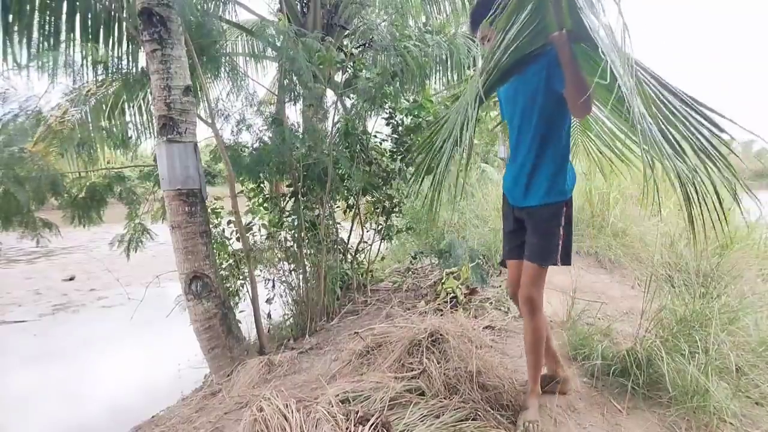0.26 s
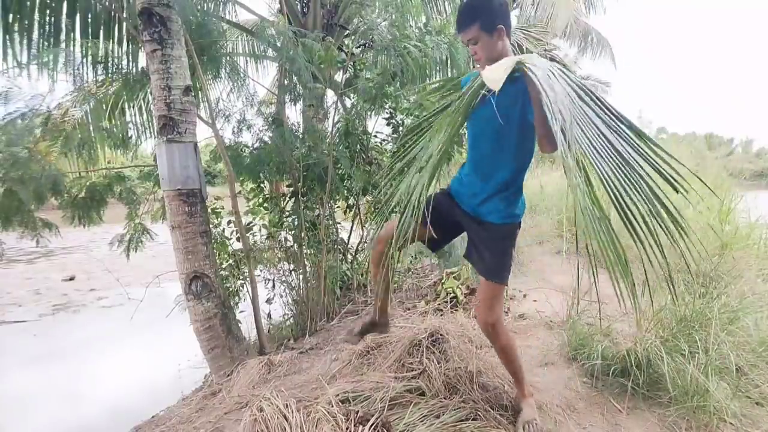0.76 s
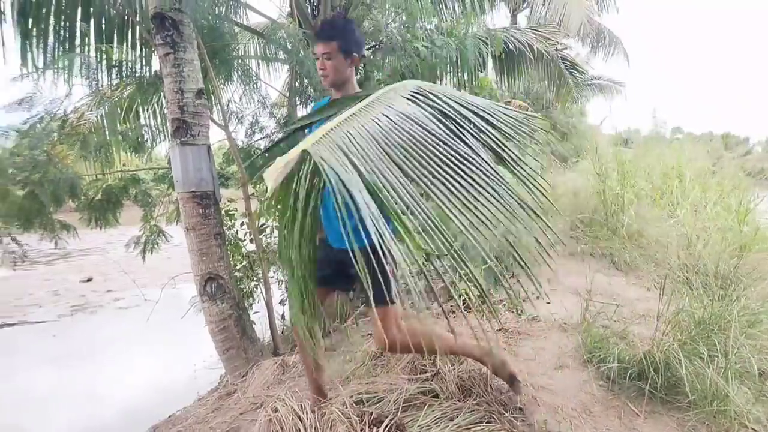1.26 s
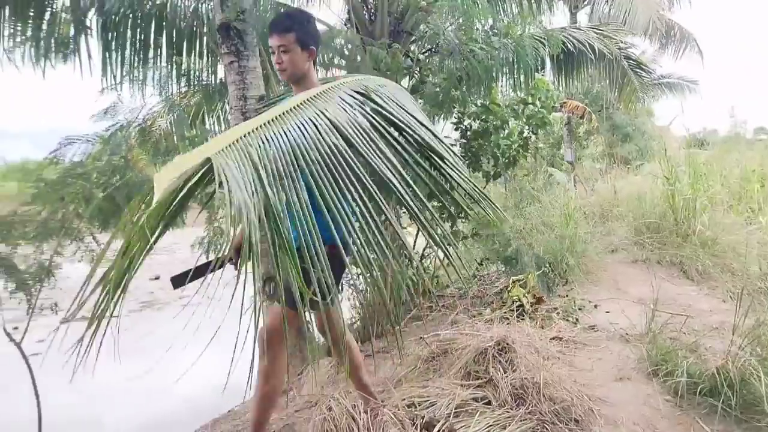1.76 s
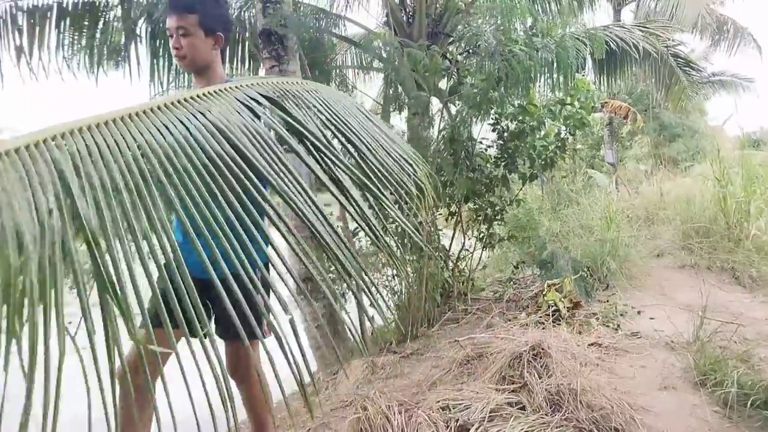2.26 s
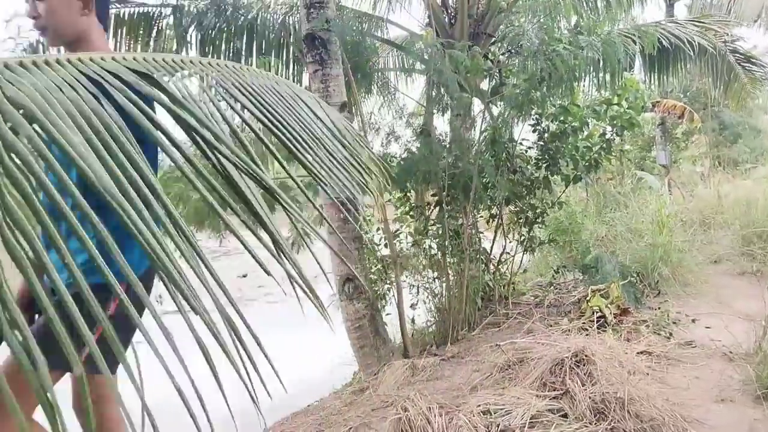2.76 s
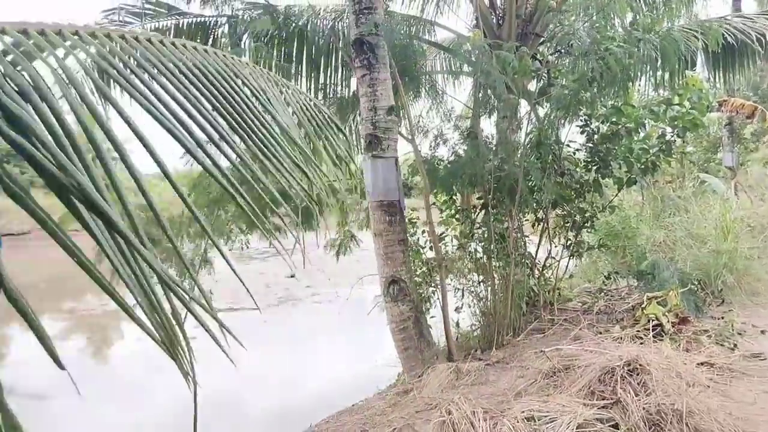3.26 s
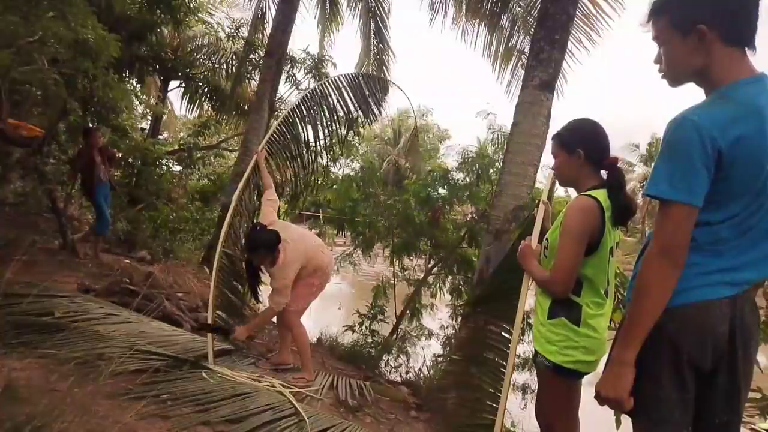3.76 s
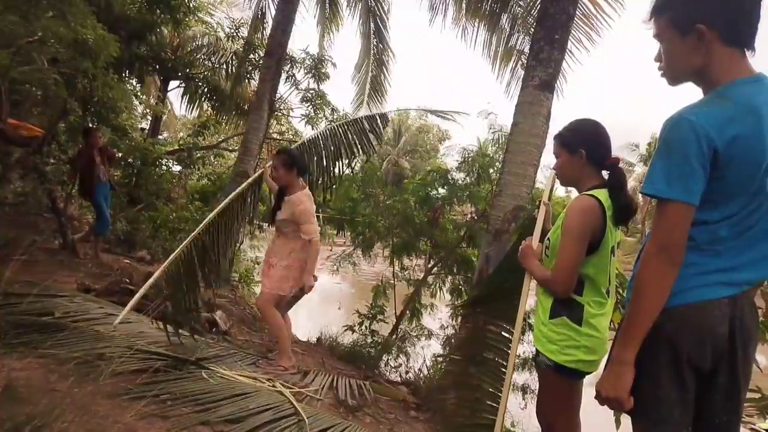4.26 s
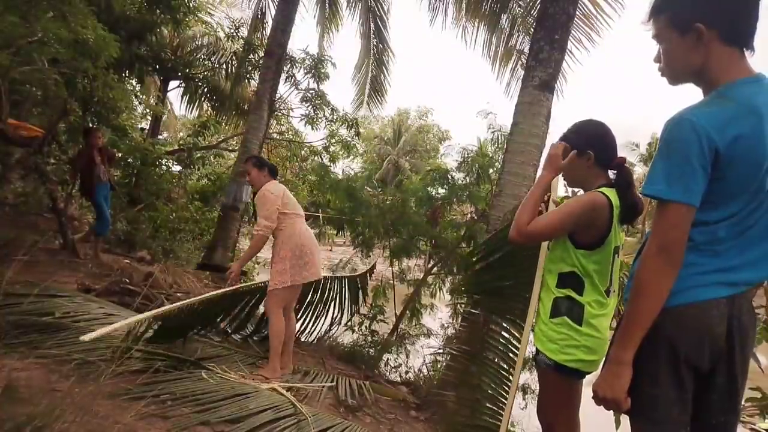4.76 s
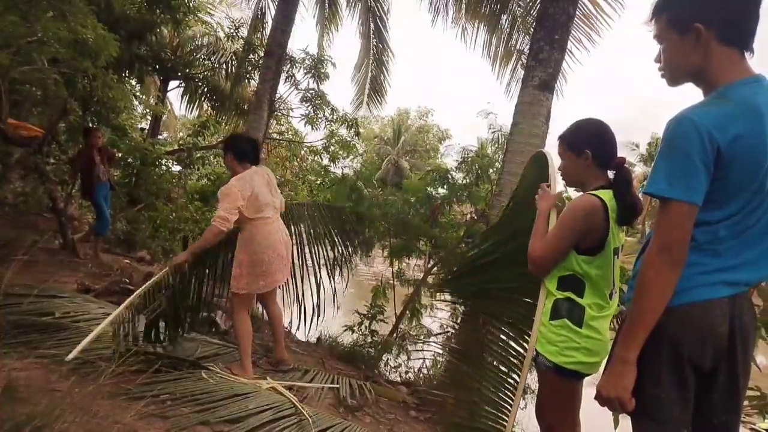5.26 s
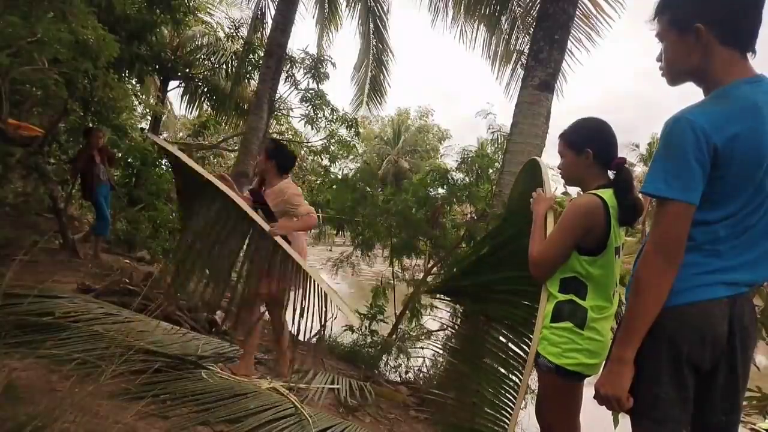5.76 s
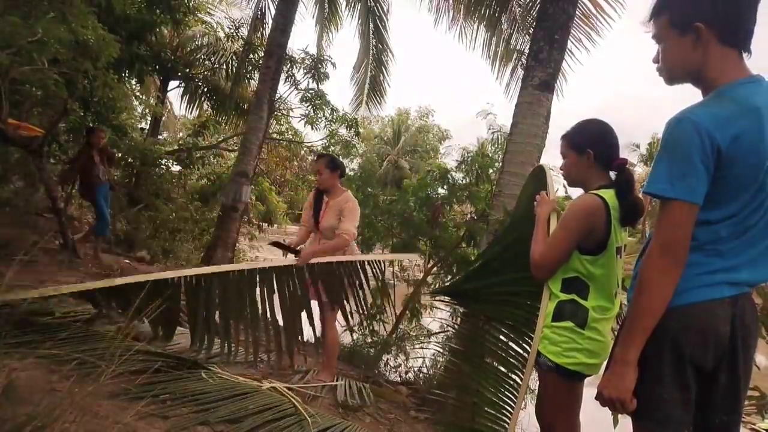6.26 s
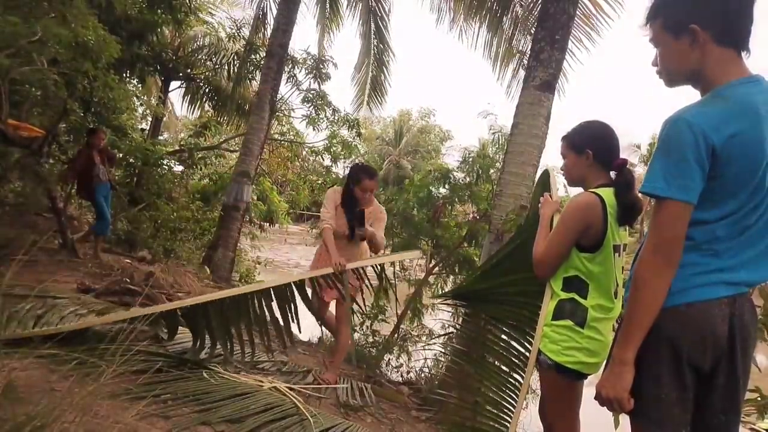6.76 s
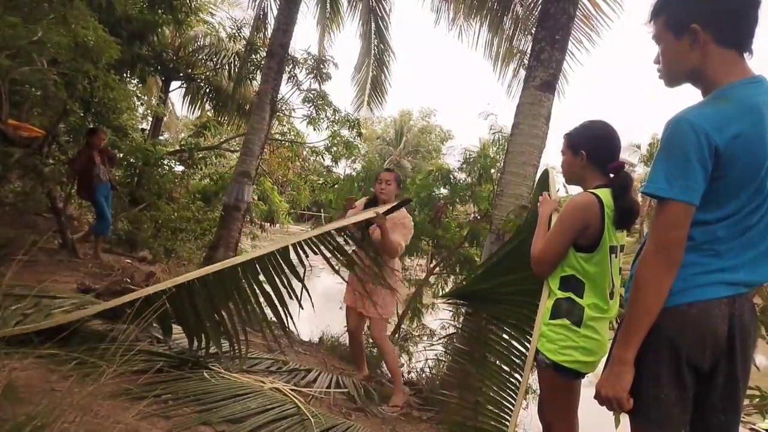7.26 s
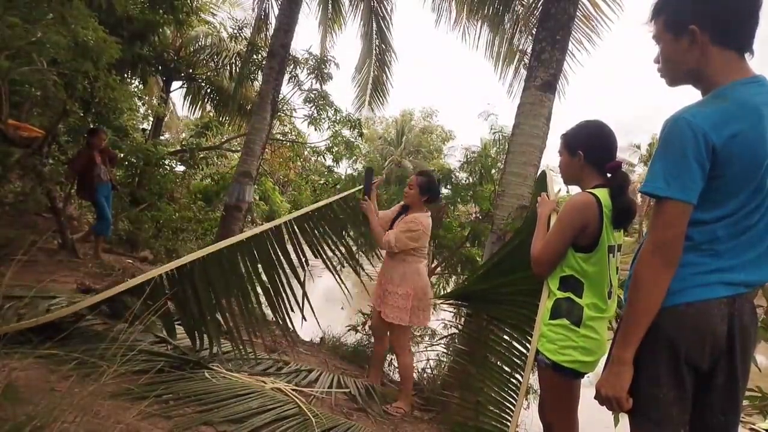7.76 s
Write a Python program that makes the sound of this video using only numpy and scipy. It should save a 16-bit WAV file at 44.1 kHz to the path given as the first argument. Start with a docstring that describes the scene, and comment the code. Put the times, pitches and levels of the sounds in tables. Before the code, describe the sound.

A bird gives a thin whistle and twitter, then another warbles clearly nearby as a dry palm frond crackles with a few sharp snaps. A run of rising chirps, with a soft dull knock beneath, grows into a rapid high trill. Fainter birds then sing farther off among the palms and bushes. Gentle outdoor air and hissing leaves continue throughout, and a low rumble drops out halfway.

```python
"""A thin whistle sounds over soft outdoor air, leaf hiss, far birds and a low rumble that stops halfway.
A songbird warbles close by, a dry frond crackles and snaps, and a fast high trill follows, with one
dull knock under it; last come songbirds deeper in the palms and bushes. Each syrinx gives a gliding,
nearly pure tone that trunks and leaves scatter back as echoes. The snaps are short noise bursts, the
knock a pulse with a noisy body; air, rumble, hiss and a far chorus are bands of noise."""
import sys
import numpy as np
from scipy import signal
from scipy.fft import rfft, irfft
from scipy.io import wavfile
from scipy.ndimage import uniform_filter1d

SR = 44100
rng = np.random.default_rng(int(sys.argv[2]) if len(sys.argv) > 2 else 0)


def dump(signal):
    """Clip the signal to [-1, 1] and save it as 16-bit WAV at the path in sys.argv[1]."""
    limited = np.clip(np.atleast_2d(signal).T, -1, 1)
    pcm = np.round(limited * 32767).astype(np.int16)
    wavfile.write(sys.argv[1], SR, pcm)


N = 353682
TIME = np.arange(N) / SR


def gain_of(db):
    """Amplitude ratio of a level in decibels."""
    return 10 ** (np.asarray(db) / 20)


def unit_rms(x):
    """Normalisation to unit power."""
    return x / np.sqrt(np.mean(x ** 2) + 1e-20)


def contour(table, at=TIME):
    """Linear interpolation in a two-column table."""
    return np.interp(at, *np.transpose(table))


def add(mix, start_s, sound):
    """Superposition of a sound on the mix."""
    part = mix[max(round(start_s * SR), 0):][:len(sound)]
    part += sound[:len(part)]


def drift(hz, size=N):
    """Random fluctuation: noise of unit rms, low-passed at hz."""
    f = np.fft.rfftfreq(size, 1 / SR)
    return unit_rms(irfft(rfft(rng.standard_normal(size)) / (1 + (f / hz) ** 4), size))


def noise(spectrum, width):
    """Coloured stereo noise: an independent side signal decorrelates the channels."""
    log_hz = np.log(np.fft.rfftfreq(N, 1 / SR) + 1)
    colour, spread = (gain_of(np.interp(log_hz, np.log(hz), db))
                      for hz, db in (np.transpose(spectrum), np.transpose(width)))
    middle, side = rfft(rng.standard_normal((2, N))) * colour
    return unit_rms(irfft(np.array([middle + spread * side, middle - spread * side]), N))


def panned(x, left_db):
    """Direction from the level difference of left over right."""
    return x * gain_of(np.array([[left_db], [-left_db]]) / 2)


def slur(start_s, length, start_hz, middle_hz, end_hz, db, fade_db=0, drop_hz=0, *, attack_s, release_s):
    """A parabolic glide, as points (time [s], frequency [Hz], level [dB])."""
    u = np.linspace(0, 1, 41)
    t = u * length
    bow_hz = middle_hz - (start_hz + end_hz) / 2
    arc = start_hz + (end_hz - start_hz) * u + bow_hz * (1 - (2 * u - 1) ** 2)
    drop = drop_hz * np.clip(1 - (length - t) / .015, 0, 1)  # in the last 15 ms
    rise_s = min(attack_s, .23 * length)
    gate = np.clip(np.minimum(t / rise_s, (length - t) / release_s), .1, 1)
    return np.transpose([start_s + t, arc - drop, db - fade_db * (u - .5) + 20 * np.log10(gate)])


def syrinx(notes, waver, flutter_db, waver_hz=180):
    """The syrinx oscillates almost sinusoidally; fast, deep frequency modulation makes it hoarse."""
    out, bend, flutter = np.zeros(N), drift(waver_hz), drift(290)
    for note in notes:
        times, hz, db = np.transpose(note)
        times = np.sort(times)
        at = np.arange(int(times[0] * SR), min(int(times[-1] * SR), N))
        t = at / SR
        pitch = uniform_filter1d(np.interp(t, times, hz), size=130) * (1 + waver * bend[at])
        ramp = np.clip(np.minimum(t - times[0], times[-1] - t) / .002, 0, 1)
        level = gain_of(np.interp(t, times, db) + flutter_db * flutter[at])
        add(out, times[0], level * np.sin(np.pi / 2 * ramp) ** 2 * np.sin(2 * np.pi * np.cumsum(pitch) / SR))
    return out


def trees(x, early_db, late_db, early_t60, late_t60, spread, build_s=.03):
    """Scattering: near trunks return early echoes, the wood behind a slower reverberant tail."""
    t = np.arange(SR) / SR
    onset = np.clip((t - .002) / .003, 0, 1)
    taps = rng.standard_normal((2, 2, SR)) * (rng.random((2, 2, SR)) < .1) * onset
    early = unit_rms(taps[0] * gain_of(-60 * t / early_t60))
    late = unit_rms(taps[1] * gain_of(-60 * t / late_t60) * np.minimum(t / build_s, 1))
    response = (gain_of(early_db) * early + gain_of(late_db) * late) / np.sqrt(SR)
    middle, side = signal.fftconvolve(x[None], response, axes=1)[:, :N]
    return np.array([middle + spread * side, middle - spread * side])


# Spectrum of the air: (frequency [Hz], relative density [dB])
AIR_SPECTRUM = [(25, -19.5), (60, -40.5), (100, -34), (150, -20), (210, -6.5), (300, -1.5), (600, -4.5),
                (900, -9), (1500, -13), (3000, -18), (5000, -30), (8000, -20.5), (13000, -25.5),
                (14500, -48), (15200, -51)]
# Stereo width of air and chorus: (frequency [Hz], side over middle [dB])
AIR_WIDTH = [(60, 6), (200, -12), (380, -26), (700, -17.5), (1290, -3), (2380, -15), (4400, -49),
             (15000, -48)]

def air():
    """Outdoor air is broadband noise with slight amplitude modulation."""
    return noise(AIR_SPECTRUM, AIR_WIDTH) * gain_of(-54 + .83 * drift(9.5))


# Spectra of the rumble and its deep buffeting: (frequency [Hz], relative density [dB])
RUMBLE_SPECTRUM = [(15, -26), (32, -16), (58, -5.5), (110, -0.5), (155, -5), (205, -15), (300, -21.5),
                   (600, -28), (2000, -75)]
BUFFET_SPECTRUM = [(12, -13), (28, 5.5), (55, 15), (90, -6), (160, -20), (500, -66)]
# Stereo width of both: (frequency [Hz], side over middle [dB])
RUMBLE_WIDTH = [(30, -6), (70, -6), (130, -17), (400, -7.5)]
# Envelope of both: (time [s], relative level [dB])
RUMBLE_LEVEL = [(0, 5), (.6, 1.5), (2, 1.5), (3.6, 2.5), (3.72, -7), (3.82, -51), (4.0, -68)]

def rumble():
    """Low-frequency noise, lumpy from random modulation, with buffeting on the right."""
    buffet = gain_of(-13.5) * panned(noise(BUFFET_SPECTRUM, RUMBLE_WIDTH), left_db=-12)
    body = panned(noise(RUMBLE_SPECTRUM, RUMBLE_WIDTH), left_db=-1)
    return (body + buffet) * gain_of(-46.5 + contour(RUMBLE_LEVEL) + 1.6 * drift(15))


# Spectrum of the leaves: (frequency [Hz], relative density [dB])
LEAF_SPECTRUM = [(300, 0), (1500, 2.5), (5000, 7.5), (9000, -7), (12500, -7.5), (15500, -6)]
# Their stereo width: (frequency [Hz], side over middle [dB])
LEAF_WIDTH = [(500, 2), (1500, -1.5), (5000, -18.5), (8000, -16.5), (12000, -11.5)]
# Their envelope: (time [s], level [dB], rms flicker [dB])
LEAF_LEVEL = [(0, -53.5, 2.3), (.6, -52, 1.9), (.9, -53.5, 1.5), (1.2, -50.5, 2), (1.6, -49.5, 0.5),
              (1.8, -55, 1.5), (2.6, -57, 1.5), (3.4, -55, 2), (3.8, -57.5, 0.5)]

def leaf_hiss():
    """Leaves sum incoherently to a fine, flickering hiss that calms halfway."""
    times, db, flicker_db = np.transpose(LEAF_LEVEL)
    hiss = noise(LEAF_SPECTRUM, LEAF_WIDTH)
    return hiss * gain_of(np.interp(TIME, times, db) + np.interp(TIME, times, flicker_db) * drift(22.4))


# Distant tones: (frequency [Hz], full level [dB])
DRONE_TONES = [(283, -73), (1089, -72), (1141, -73.5)]
# Their swell: (time [s], gain [dB])
DRONE_SWELL = [(0, -5), (2.3, -5), (3.0, 0)]

def drone():
    """Faint sinusoids, each wandering in frequency, superpose into a drone."""
    tones = sum(gain_of(db) * np.sqrt(2) * np.sin(2 * np.pi * np.cumsum(hz + 2.64 * drift(5)) / SR)
                for hz, db in DRONE_TONES)
    return tones * gain_of(contour(DRONE_SWELL))


# Spectrum of far twittering: (frequency [Hz], relative density [dB])
CHORUS_SPECTRUM = [(2500, -18.5), (5000, -9.5), (6200, 2), (7500, 1.5), (8300, -4), (9300, -12.5),
                   (12000, -18), (14000, -40)]
# Its envelope: (time [s], level [dB])
CHORUS_LEVEL = [(0, -55.5), (.8, -87), (1.6, -63), (2.1, -56), (4.9, -45), (5.3, -78), (6.0, -71),
                (6.4, -65), (7.2, -59.5), (8.0, -59.5)]

def chorus():
    """Many far voices add incoherently into one high noise band that swells unevenly."""
    level_db = contour(CHORUS_LEVEL) + 2 * drift(21)
    return noise(CHORUS_SPECTRUM, AIR_WIDTH) * gain_of(level_db)


# Far calls and, at 2.317 s and 2.56 s, the hoarse low part of two trill chips:
# (time [s], duration [s], start [Hz], end [Hz], relative level [dB])
RASPS = [(0.024, 0.084, 8800, 7900, -53), (0.026, 0.071, 5840, 5580, -46.5), (0.502, 0.25, 5080, 4770, -50),
         (1.136, 0.064, 2254, 2540, -39.5), (2.317, 0.04, 4760, 5160, -47.5),
         (2.56, 0.055, 5020, 5340, -46), (4.32, 0.11, 2284, 2200, -52), (4.591, 0.095, 4480, 4450, -46),
         (5.701, 0.078, 5740, 6300, -52), (6.88, 0.19, 3400, 3534, -47), (7.025, 0.168, 4040, 4300, -50),
         (7.572, 0.078, 4900, 4950, -42.5), (7.599, 0.062, 1850, 1730, -42.5),
         (7.846, 0.066, 5580, 5700, -41), (7.96, .06, 6100, 6400, -47)]
# Scratchy notes: (time [s], duration [s], start [Hz], middle [Hz], end [Hz], relative level [dB])
FAR_SONG = [ (.15, 0.57, 6130, 6350, 6160, -55), (4.245, 0.057, 2035, 2104, 2080, -56),
            (4.303, 0.14, 2206, 2655, 2230, -55), (4.567, 0.025, 3530, 4000, 4130, -49),
            (4.589, 0.096, 4127, 4030, 3950, -52), (5.183, 0.048, 2340, 2655, 3250, -57),
            (5.21, 0.036, 3130, 3650, 4170, -51), (5.222, 0.025, 2640, 3200, 3950, -49.5),
            (5.363, 0.027, 3930, 4120, 4150, -55.5), (5.385, .022, 5120, 5530, 5700, -55),
            (5.424, 0.03, 3640, 4070, 4800, -54), (5.438, 0.032, 5650, 5370, 5400, -58),
            (5.502, 0.016, 3750, 3950, 4200, -53), (5.512, 0.023, 5450, 5150, 4550, -53.5),
            (5.72, 0.04, 3380, 3770, 4300, -55), (5.764, 0.03, 3710, 4330, 4800, -55),
            (5.765, .036, 4720, 5540, 5850, -53), (5.97, 0.059, 1920, 1814, 1800, -57),
            (6.126, .014, 5660, 4540, 3300, -59), (6.239, .016, 5100, 4100, 3600, -60),
            (6.248, 0.02, 2400, 2500, 2550, -54.5), (6.421, 0.025, 3540, 3125, 2600, -52),
            (6.497, .016, 5400, 5070, 4500, -61), (6.54, 0.018, 7300, 7450, 7400, -58),
            (7.076, 0.02, 5280, 5340, 5300, -49.5), (7.765, 0.039, 6730, 5850, 5100, -45),
            (7.787, 0.021, 5900, 6800, 7900, -52), (7.799, 0.054, 6400, 5600, 4970, -47),
            (7.908, 0.056, 5500, 5480, 5480, -48.5), ]

def far_song_and_rasps():
    """Beyond the critical distance, echoes outweigh the direct sound of notes and rasps."""
    rasps = [[(s, start, db - 1.5), (s + length / 2, (start + end) / 2, db), (s + length, end, db - 9)]
             for s, length, start, end, db in RASPS]
    notes = [slur(*row, attack_s=.014, release_s=.003) for row in FAR_SONG]
    voice = gain_of(-2) * syrinx(rasps, waver=.06, flutter_db=3, waver_hz=700)
    voice += gain_of(5) * syrinx(notes, waver=.032, flutter_db=3, waver_hz=400)
    echoes = trees(voice, early_db=-4.5, late_db=-3.2, early_t60=.2, late_t60=.75, spread=.008)
    return gain_of(-3) * voice + echoes


# Long whistles: (time [s], duration [s], held pitch [Hz], scoop [Hz], warble depth [Hz], rise [s],
# relative level [dB], fade [dB])
WHISTLES = [(0.12, 0.11, 7206, 900, 570, 0.02, -17, -4.5), (0.226, 0.048, 7070, 5, 40, 0.0083, -21, -3),
            (0.34, 0.17, 7483, 560, 352, 0.086, -17, 10.5)]
# Closing twitter: (time [s], duration [s], start [Hz], middle [Hz], end [Hz], relative level [dB])
TWITTER = [(.526, 0.028, 7130, 7230, 8000, -36.5), (.569, 0.018, 7070, 7400, 7660, -37),
           (0.606, 0.05, 7400, 7420, 7700, -37.5), (.653, 0.024, 7330, 7400, 7750, -35),
           (.671, 0.018, 7300, 7770, 8150, -34), (0.695, 0.0266, 7280, 7540, 8300, -31.5),
           (.725, 0.042, 7700, 7570, 8400, -32.5), (.773, 0.024, 8250, 7820, 7840, -35.5)]

def whistler(scoop_s=.025, warble_hz=48.2, settle_s=.042, release_s=.0082):
    """Damped frequency modulation: whistles scoop up and settle; a twitter follows further right."""
    voice = np.zeros(N)
    for s, length, held_hz, scoop_hz, depth_hz, rise_s, db, fade_db in WHISTLES:
        t = np.arange(0, length, 1 / SR)
        scoop = scoop_hz * np.exp(-(t / scoop_s) ** 4)
        warble = depth_hz * np.exp(-t / settle_s) * np.cos(2 * np.pi * warble_hz * t)
        pitch = held_hz - scoop - warble + 28 * drift(30, len(t))
        # faint artificial side tones 3940 Hz above and below the whistle
        side_tones = 1 + gain_of(-27) * np.sin(2 * np.pi * 3940 * t)
        gate = np.clip(np.minimum(t / rise_s, (length - t) / release_s), 0, 1)
        level = gain_of(db - fade_db * (t / length - .5)) * gate
        add(voice, s, level * side_tones * np.sin(2 * np.pi * np.cumsum(pitch) / SR))
    notes = [slur(*row, attack_s=.0036, release_s=.0069) for row in TWITTER]
    twitter = syrinx(notes, waver=.011, flutter_db=2)
    echoes = trees(voice + twitter, early_db=-7.5, late_db=-23.5,
                   early_t60=.068, late_t60=.43, spread=.75)
    return gain_of(-2) * (panned(voice, left_db=-4.5) + panned(twitter, left_db=-14) + echoes)


# Close song: (time [s], duration [s], start [Hz], middle [Hz], end [Hz], relative level [dB],
# fade [dB], closing drop [Hz])
CLOSE_SONG = [ (0.871, 0.018, 3270, 2820, 2670, -35.5, 1, 0), (.887, .016, 2930, 3380, 3300, -21.5, -5, 0),
              (.902, 0.019, 3430, 3575, 3310, -15.5, 0, 0),
              (.925, 0.045, 3680, 3566, 3440, -19.5, 7.5, 800),
              (1.019, 0.081, 3686, 3507, 3340, -17.5, 6, 799), (1.102, 0.06, 2310, 2160, 2300, -50, -1, 0),
              (1.195, 0.022, 2740, 2610, 2450, -31.5, 5, 0), (1.22, 0.038, 2790, 2905, 3034, -18.5, 8, 4),
              (1.264, 0.04, 4600, 4340, 4700, -27.5, -3, 6),
              (1.312, 0.034, 4300, 3220, 2630, -26.5, -2.5, 2),
              (1.346, 0.044, 2520, 2190, 2220, -41.5, -11, 0),
              (1.391, 0.0095, 1980, 1933, 1900, -31, -7, 0), (1.467, 0.033, 4075, 4000, 3830, -20, 0, 0),
              (1.505, 0.03, 3740, 3330, 2750, -21.5, -5, 0), (1.533, 0.043, 3370, 3210, 3110, -21, 0, 0),
              (1.637, 0.0366, 3160, 3090, 3260, -24.5, -9.5, 4),
              (1.671, 0.048, 3426, 3620, 3500, -16.5, 5, 2), (1.715, 0.048, 3570, 3470, 3465, -21, 8, -2),
              (1.836, 0.033, 4400, 4235, 4180, -41, -2, 0), (1.869, 0.074, 4200, 3590, 3670, -36, 14, 2),
              (1.945, 0.037, 4650, 4450, 4530, -39.5, 5, 0), (1.984, 0.023, 4680, 5080, 5000, -44, 0, 0),
              (2.067, .016, 4730, 4750, 4700, -49, 0, 2), ]

def close_songbird():
    """Near a source the direct sound dominates: clean slurs with little scatter from the leaves."""
    notes = [slur(*row, attack_s=.0065, release_s=.003) for row in CLOSE_SONG]
    voice = gain_of(.53) * syrinx(notes, waver=.008, flutter_db=1.5, waver_hz=240)
    echoes = trees(voice, early_db=-14, late_db=-22, early_t60=.08, late_t60=.4, spread=1.2)
    return panned(voice, left_db=-1.2) + echoes


# Envelope of the crackling leaflets: (time [s], level [dB])
CRACKLE_LEVEL = [(.95, -86), (1.1, -64), (1.18, -56), (1.27, -63), (1.34, -56), (1.42, -63), (1.5, -63),
                 (1.58, -58), (1.8, -83)]

def crackle(ticks_per_s=260):
    """Dry leaflets tick as a Poisson process: impulses of uneven size, left and right."""
    sizes = gain_of(4 * np.minimum(rng.exponential(1, (2, N)), 2.5))
    clicks = sizes * rng.choice([-1, 1], (2, N)) * (rng.random((2, N)) < ticks_per_s / 2 / SR)
    band = signal.butter(2, [4000, 13000], "bandpass", fs=SR, output="sos")
    fibre = signal.sosfilt(band, rng.standard_normal(200) * np.exp(-TIME[:200] / .0006))
    ticks = signal.oaconvolve(clicks + .5 * clicks[::-1], fibre[None], axes=1)[:, :N]
    return unit_rms(ticks) * gain_of(contour(CRACKLE_LEVEL))


# Dry snaps and, at 2.575 s and 2.584 s, the noisy body of the dull knock:
# (time [s], level [dB], centre [Hz], width [octaves], 60 dB decay [s], rise [s])
NOISE_BURSTS = [(1.079, -50, 6000, 1.2, .02, .001), (1.166, -42.5, 5240, 1.6, 0.25, 0.0085),
                (1.1792, -26, 3300, 0.47, .018, 0.00056), (1.18, -34, 4730, 0.06, 0.11, .003),
                (1.1847, -28, 2700, 0.33, .025, .0012), (1.184, -45, 8000, 0.91, 0.046, .002),
                (1.1902, -31, 3680, .6, .014, .0005), (1.393, -32.5, 2500, 0.29, 0.032, 0.0013),
                (1.4385, -47, 11000, 0.65, .02, .001), (1.57, -47, 8000, 0.52, 0.044, .002),
                (2.575, -45.5, 740, 0.42, 0.05, 0.0023), (2.584, -45.5, 1510, 2.8, 0.068, .002),
                (3.316, -55, 12900, 0.26, .08, .001)]

def noise_bursts(size=8192):
    """Exponentially damped band noise forms the frond's snaps and the body of the knock."""
    out, hz, t = np.zeros((2, N)), np.fft.rfftfreq(size, 1 / SR) + 1, TIME[:size]
    for s, db, centre_hz, octaves, t60, rise_s in NOISE_BURSTS:
        colour = np.exp(-.5 * (np.log2(hz / centre_hz) / octaves) ** 2)
        level = np.minimum(t / rise_s, 1) * gain_of(db - 60 * np.maximum(t - rise_s, 0) / t60)
        middle, side = unit_rms(irfft(rfft(rng.standard_normal((2, size))) * colour)) * level
        add(out[0], s, middle + 1.06 * side)
        add(out[1], s, middle - .74 * side)
    return out


# Effort of the trilling bird: (time [s], relative level [dB])
TRILL_EFFORT = [(2.09, -44), (2.21, -37), (2.75, -31.5), (3.3, -27), (3.49, -29), (3.66, -23), (4.68, -25),
                (4.91, -27.5)]

def trill_beats(start_s, first_gap_s, last_gap_s, order, count):
    """Pulses (time [s], level [dB]) whose period changes steadily (order 1) or mostly late (order 2)."""
    gaps = first_gap_s + (last_gap_s - first_gap_s) * np.linspace(0, 1, count - 1) ** order
    times = start_s + np.append(0, np.cumsum(gaps))
    return np.transpose([times, contour(TRILL_EFFORT, times)])


# Response of its throat: (frequency [Hz], gain [dB])
THROAT_RESPONSE = [(4200, 0), (5000, -3), (5420, -8), (5720, 1), (6100, -.5), (6650, 1), (7200, -1),
                   (7700, 0), (8200, 0), (8800, -1)]

def throat(x):
    """Source and filter: a notch near 5.4 kHz gives the trill a firm lower edge."""
    return irfft(rfft(x) * gain_of(contour(THROAT_RESPONSE, np.fft.rfftfreq(N, 1 / SR))), N)


# One rising chip: (time from beat [s], base pitch [Hz], relative level [dB])
CHIP = [(-.011, 3695, -20), (-.004, 4875, -17.5), (0, 5690, -5), (.002, 6350, 2.5), (.004, 7200, 1.5),
        (.007, 7980, -6.5), (.011, 8550, -18)]

def trill_chips():
    """Upward frequency sweeps open the trill; the series quickens, grows louder and sinks in pitch."""
    beats = trill_beats(2.0945, first_gap_s=.1172, last_gap_s=.0968, order=2, count=13)
    lifts_hz = np.linspace(553, -150, len(beats))
    sweeps = [np.add(CHIP, (s, hz, db)) for (s, db), hz in zip(beats, lifts_hz)]
    return gain_of(.9) * throat(syrinx(sweeps, waver=.033, flutter_db=1.5, waver_hz=900))


# Strokes of a syllable: (time from beat [s], base pitch [Hz], relative level [dB])
LEAD_IN = [(-.03, 4080, -18.5), (-.023, 4830, -11.5), (-.017, 5550, -2)]
UPSTROKE = [(-.03, 4900, -35), (-.026, 5667, -16), (-.023, 5895, -6.5), (-.019, 6356, -2.5),
            (-.015, 6700, 1.5), (-.011, 6800, -12)]
DOWNSTROKE = [(-.003, 8980, -19), (.001, 8174, -9), (.005, 7660, 1), (.008, 6967, -3.5), (.012, 6450, -1.5),
              (.018, 5650, -6)]

def trill_run(scatter_hz=48, scatter_db=.5, lead_ins=14):
    """Hoarse upward and clear downward sweeps alternate with a lengthening period."""
    beats = trill_beats(3.497, first_gap_s=.0592, last_gap_s=.0752, order=1, count=22)
    scatter = rng.standard_normal((len(beats), 2)) * (scatter_hz, scatter_db)
    offsets = [(s, hz, db + more_db) for (s, db), (hz, more_db) in zip(beats, scatter)]
    ups = [np.add(UPSTROKE, offset) for offset in offsets]
    downs = [np.add(DOWNSTROKE, offset) for offset in offsets]
    # the later syllables gain a lead-in, at first higher and softer
    ups += [np.add(LEAD_IN, (s, 493.7 * early, db - 11 * early))
            for (s, db), early in zip(beats[-lead_ins:], np.linspace(1, 0, lead_ins))]
    hoarse = syrinx(ups, waver=.03, flutter_db=1.5, waver_hz=500)
    clear = syrinx(downs, waver=.017, flutter_db=1.5, waver_hz=600)
    return gain_of(-1.13) * throat(hoarse + clear)


def swaying_trees(x, sway_hz=4.3, count=3, **wood):
    """Time-varying scattering: as leaves move, several echo patterns take turns."""
    turns = (np.cos(np.pi * (sway_hz * TIME + k / count)) for k in range(count))
    return np.sqrt(2 / count) * sum(trees(x * turn, spread=.003, **wood) for turn in turns)


# Direct transmission of the trill through the leaves: (time [s], gain [dB])
TRILL_DIRECT = [(2.1, -3.5), (2.8, -4.5), (3.0, -6), (3.4, -7), (3.6, -4), (3.85, -7), (4.3, -6),
                (4.55, -2), (4.9, -2.5)]

def triller():
    """Multipath propagation: part of the trill passes straight through the leaves, part scatters."""
    chips, run = trill_chips(), trill_run()
    chip_echoes = swaying_trees(chips, early_db=-3.3, late_db=-2.5, early_t60=.16, late_t60=.62)
    run_echoes = swaying_trees(run, early_db=-3.2, late_db=-3.4, early_t60=.08, late_t60=.7)
    return (chips + run) * gain_of(contour(TRILL_DIRECT)) + chip_echoes + run_echoes


def knock(time_s=2.5855, peak_hz=240, db=-30):
    """A single pressure pulse without resonance is heard as a dull knock."""
    u = (np.pi * peak_hz * (TIME - time_s)) ** 2
    return gain_of(db) * (1 - 2 * u) * np.exp(-u)


# Song among the trees: (time [s], duration [s], start [Hz], middle [Hz], end [Hz],
# relative level [dB], fade [dB])
TREE_SONG = [ (6.681, 0.033, 3700, 4090, 4020, -40.5, 1), (6.708, 0.028, 3670, 2800, 2440, -35, 16),
             (6.789, 0.025, 2730, 2790, 3000, -41, 2), (6.889, 0.038, 2935, 2580, 2530, -38, 14),
             (6.931, 0.028, 2120, 2350, 2460, -44, 10), (6.986, 0.064, 2405, 2074, 2050, -46, 15.5),
             (7.08, 0.052, 2320, 1930, 1670, -50.5, 3), (7.146, 0.064, 2957, 2740, 2660, -32.5, -3),
             (7.213, 0.068, 2796, 2728, 2656, -33.5, 8), (7.251, 0.078, 1742, 1716, 1820, -49.5, 3),
             (7.305, 0.078, 1904, 2087, 2270, -44.5, -8), (7.363, 0.019, 4200, 3840, 3500, -41, -4),
             (7.379, 0.038, 3850, 3304, 2990, -28.5, 3), (7.428, 0.041, 3284, 2950, 2130, -36.5, 0),
             (7.468, 0.027, 2080, 2475, 2050, -34, 0), (7.496, 0.022, 2080, 2485, 2060, -33.5, 0),
             (7.52, 0.024, 2080, 2443, 2070, -35, 0), (7.485, 0.06, 4326, 3967, 4156, -31, -9),
             (7.555, 0.032, 3700, 2700, 2420, -31.5, 9), (7.591, 0.026, 4090, 4060, 4000, -36, -11),
             (7.607, 0.06, 2393, 2490, 2670, -40.5, 3), (7.72, 0.012, 3670, 3220, 2780, -35.5, -3),
             (7.741, 0.015, 3190, 2900, 2440, -39.5, 11), (7.844, 0.033, 4400, 3494, 3370, -29.5, 4),
             (7.877, 0.026, 3350, 3800, 4240, -37.5, 8), (7.906, 0.031, 4250, 4040, 3720, -30, 2), ]

def tree_songbirds():
    """Reverberation leaves a softer trace after each clear note from among the trees."""
    notes = [slur(*row, attack_s=.012, release_s=.0025) for row in TREE_SONG]
    voice = gain_of(1.3) * syrinx(notes, waver=.016, flutter_db=2.3, waver_hz=350)
    return voice + trees(voice, early_db=-8.5, late_db=-5, early_t60=.2, late_t60=.85,
                         spread=.003, build_s=.035)


def scene():
    """Linear superposition of birds, foliage, knock and background."""
    birds = whistler() + close_songbird() + triller() + tree_songbirds() + far_song_and_rasps() + chorus()
    return birds + noise_bursts() + leaf_hiss() + crackle() + knock() + air() + rumble() + drone()


def record(dry):
    """Band limiting by a linear-phase low-pass filter at 15.5 kHz."""
    lowpass = signal.firwin(511, 15500, window=("kaiser", 9), fs=SR)
    return signal.oaconvolve(dry, lowpass[None], "same", axes=1)


dry = scene()
out = record(dry)
dump(out)
```